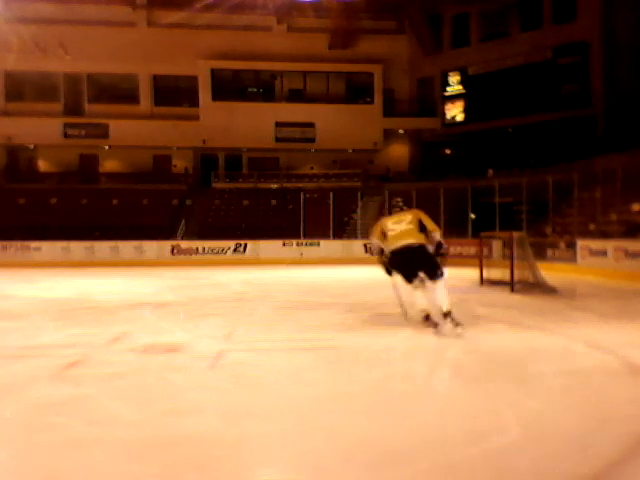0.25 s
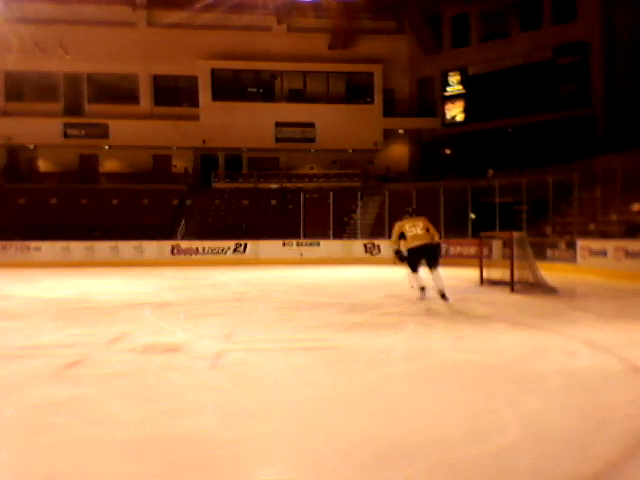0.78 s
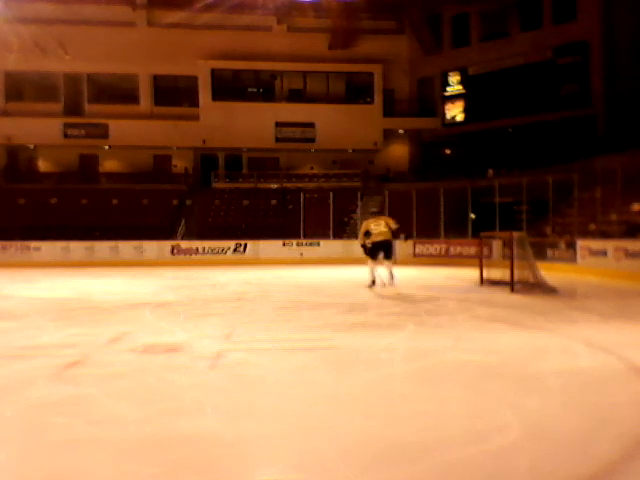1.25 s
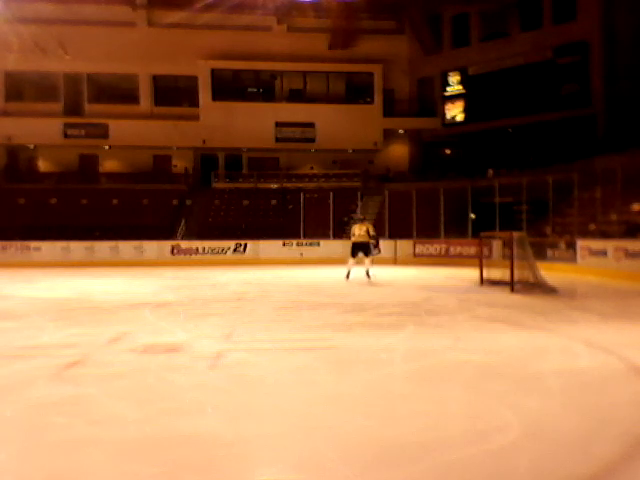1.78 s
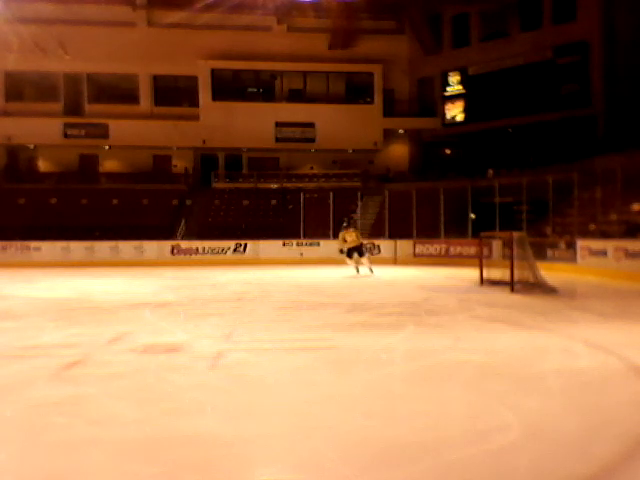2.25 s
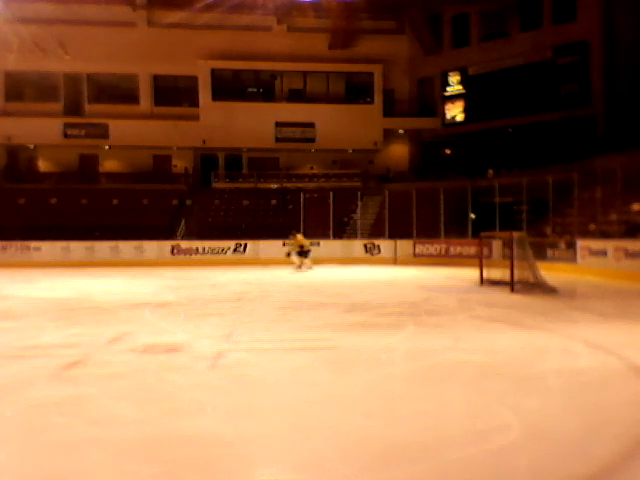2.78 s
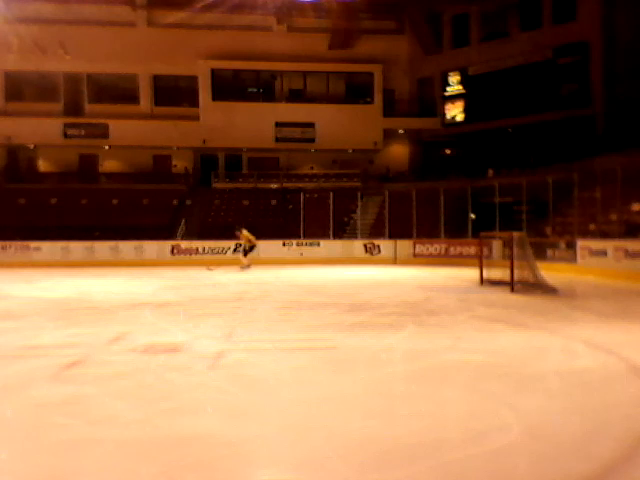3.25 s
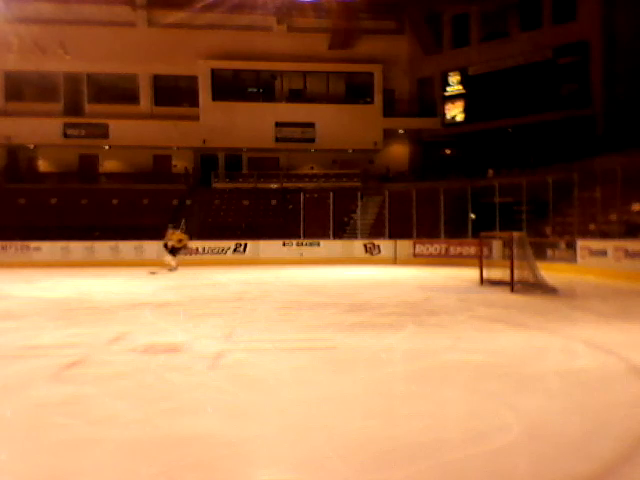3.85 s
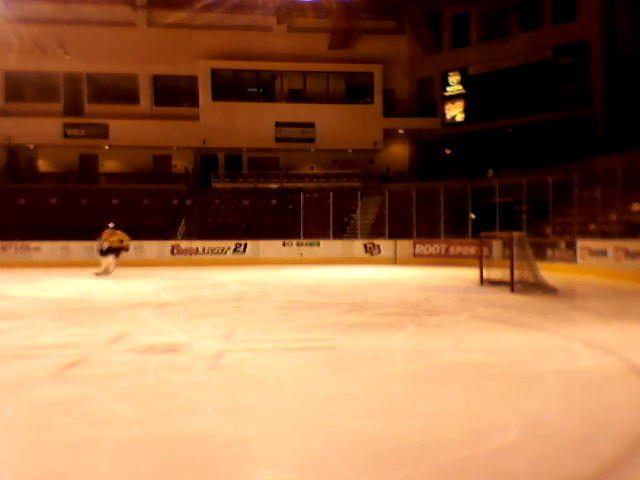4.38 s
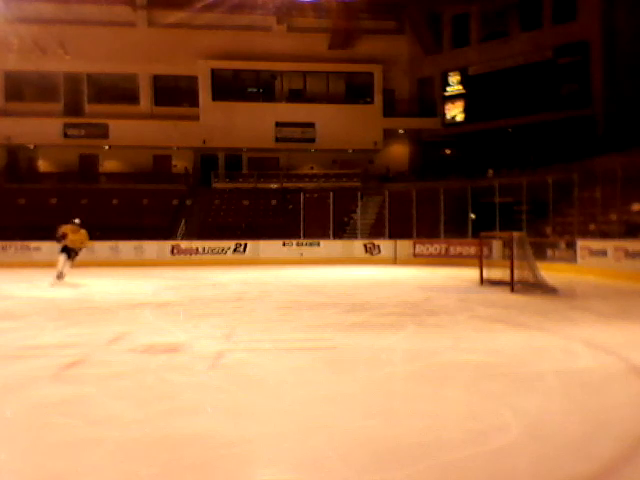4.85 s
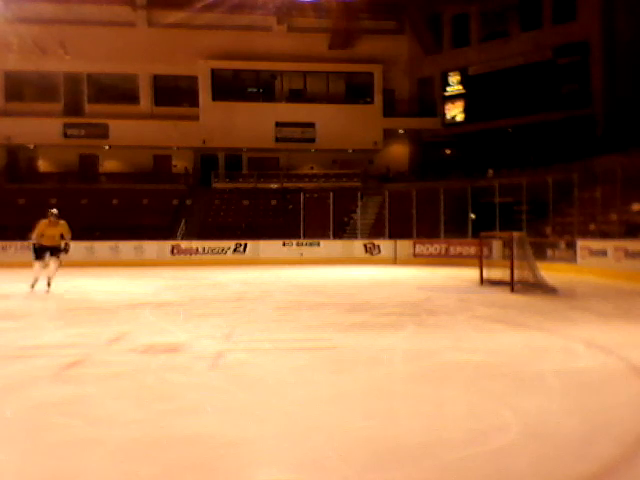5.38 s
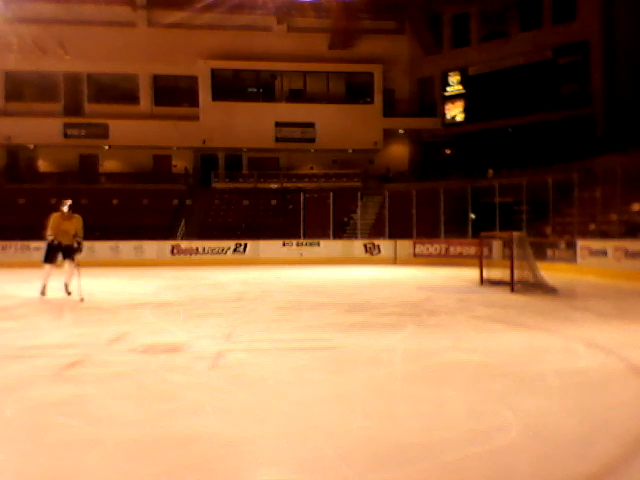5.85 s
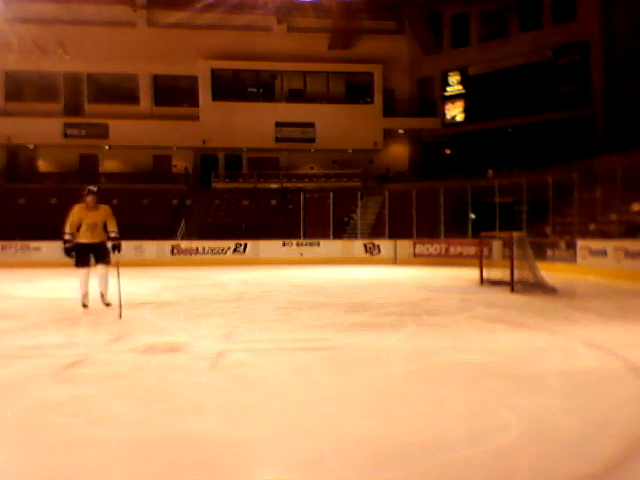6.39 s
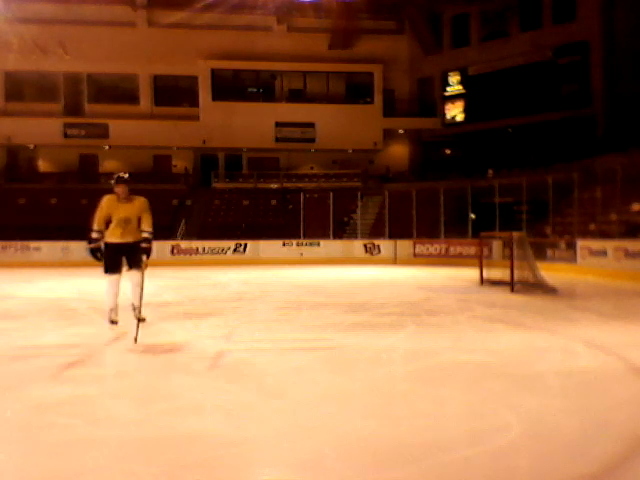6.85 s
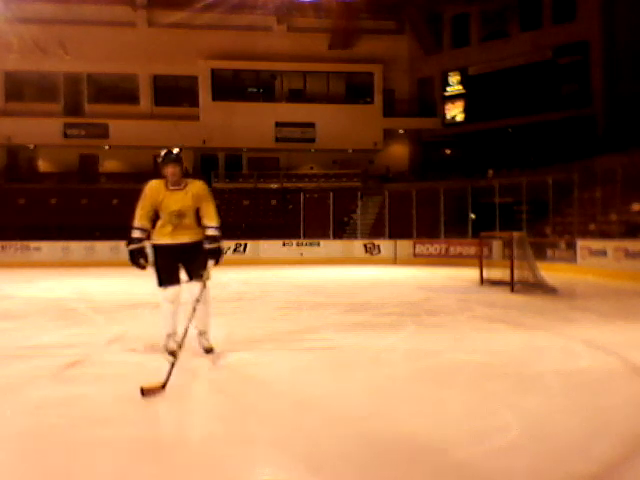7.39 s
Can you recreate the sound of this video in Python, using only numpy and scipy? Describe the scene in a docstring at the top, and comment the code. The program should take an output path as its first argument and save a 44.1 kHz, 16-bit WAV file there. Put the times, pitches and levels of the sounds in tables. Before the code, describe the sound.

Skate blades scrape over ice in short strides, mixed with sharp taps of steel and a hockey stick. A loud carving turn follows, crunching and throwing a hiss of spray, before the skater glides on more softly with occasional clacks. Everything reverberates in a big empty rink with a low rush of ventilation, and the small microphone overloads a little on the loudest hits.

```python
"""A hockey player's skates glide away over the ice, carve a hard turn and glide back.
The steel edges crush the ice in many tiny snaps that ring blade and boot and throw up spray.
Skates scuff and ping as they land; stick and blades clack on the ice. The large, empty indoor rink
echoes over the hum of its ventilation, and a small microphone overloads on the loudest hits."""
import sys
import numpy as np
from scipy import signal
from scipy.fft import rfft, irfft, next_fast_len
from scipy.io import wavfile
from scipy.ndimage import uniform_filter1d

SR = 44100
rng = np.random.default_rng(int(sys.argv[2]) if len(sys.argv) > 2 else 0)


def wav_record(signal):
    """Record a signal, one row per channel, as 16-bit PCM in the file named by sys.argv[1]."""
    frames = np.transpose(np.atleast_2d(signal))
    bounded = np.clip(frames, -1, 1)
    # unit amplitude maps onto the largest positive 16-bit level
    quanta = np.round(bounded * 32767).astype(np.int16)
    wavfile.write(sys.argv[1], SR, quanta)


N = 336702
TIME = np.arange(N) / SR

# Levels in the tables are relative: the functions turn whole layers up or down.
# The tone of rushing air, grinding ice, rumbling boot and ice spray.
# Each row: frequency in Hz, level in dB.
AIR_TONE = [(20, -32), (40, -13.5), (55, 2), (90, -3), (120, 8), (160, 0), (300, 8.5), (800, 3.5),
            (2000, -5), (7000, -11)]
GRIND_TONE = [(250, -37), (500, -16.5), (680, -4.5), (900, 0.5), (1130, 1), (1380, 0), (1700, -3.5),
              (2000, -1.5), (2350, -5.5), (2800, -8.5), (3500, -21), (5000, -30.5), (7000, -66.5)]
BOOT_TONE = [(50, -43.5), (130, -13), (185, -6.5), (235, -0.5), (320, 2.5), (420, 3), (540, 4.5), (750, -6),
             (1200, -41.5)]
SPRAY_TONE = [(1500, -46.5), (2400, -2), (3150, 1.5), (3700, -3), (4150, -1), (4900, -2.5), (5600, -5.5),
              (6100, -8), (6600, -16), (7200, -9)]
# How long the hall rings. Each row: frequency in Hz, ring time (seconds to fade by 60 dB).
HALL_RING_TIMES = [(100, 2.2), (500, 2.54), (1500, 1.95), (3500, 1.75), (7000, 0.27)]
# Echoes off the boards around the rink. Each row: delay in seconds, level in dB.
BOARD_ECHOES = [(0.03, -19.5), (0.06, -27.5), (.126, -16)]
# A blade is set down. Each row: start in seconds, level in dB, lowest pitch in Hz.
BLADE_PINGS = [(0.626, -7.5, 2500), (.732, -5.5, 2430), (.762, -1.5, 2300), (0.883, -11, 2550),
               (1.998, -34, 3060), (3.2945, -1, 3820), (3.385, -3.5, 3260), (3.450, -4.5, 3050),
               (3.465, -8.5, 2730), (4.254, -7, 3210), (4.366, -12, 2820), (6.181, -15, 2680),
               (6.311, -20, 2370)]
# The tones in a ping. Each row: multiple of the lowest pitch, level in dB, ring time in seconds.
PING_TONES = [(1, 6.5, 0.013), (1.13, 8.5, 0.0087), (1.281, 4, 0.012), (1.418, -10, 0.0046),
              (1.75, -7.5, 0.0088)]
# Stick or blade hits the ice. Each row: start in seconds, level in dB, main pitch in Hz, hardness in dB.
ICE_CLACKS = [(0.122, -7, 1005, -6), (.457, -6.5, 910, 0), (0.6299, -8.5, 883, 4), (0.7324, -8, 1160, -.5),
              (0.7624, -2.5, 1010, 5), (1.190, -7.5, 1104, 7), (1.287, -7, 866, -1), (1.4501, -7, 1273, -4),
              (3.591, -10.5, 1000, 1), (4.4926, -3.5, 1060, -4), (4.4952, -3, 1020, 5),
              (4.521, -4, 1080, -1.5), (4.55, -8.5, 990, 6), (4.617, -10, 980, 4.5), (5.4578, -11, 910, -7),
              (6.180, -11, 906, 10), (6.289, -10.5, 980, -12), (6.311, -12.5, 1150, 2),
              (6.336, -17, 1110, -9), (6.764, -3.5, 895, 2.5), (6.8997, -8, 1100, 3)]
# The tones in a clack, before they are moved to its pitch.
# Each row: frequency in Hz, level in dB, ring time in seconds.
CLACK_TONES = [(340, -33, .025), (700, -39.5, .012), (923, 17, .013), (1636, 12, 0.008),
               (2326, 7.5, 0.0091), (2680, -9, 0.0064), (4200, -27, .007)]
# Where the steel blade and its holder ring. Each row: frequency in Hz, width in Hz, level in dB.
BLADE_RESONANCES = [(502, 7, -17.5), (837, 36, -12), (1080, 160, -19), (1650, 210, -9), (2040, 69, -23.5),
                    (3204, 340, -15), (3660, 170, -6.5), (4720, 230, -16), (5240, 92, -11), (5970, 170, -9),
                    (6460, 160, 4.5)]
# An edge bites as a skate lands or pushes off.
# Each row: start in seconds, length in seconds, level in dB, spray in dB relative to that level.
EDGE_SCUFFS = [(0.136, 0.048, -13.5, -18), (0.477, 0.0067, -17.5, -10), (0.543, 0.0099, -14, -18),
               (.626, 0.005, -15, 4.5), (0.7294, 0.0087, -9, -7.5), (0.748, .0074, -13, -4),
               (0.76, .008, -16, -13.5), (0.882, 0.0089, -10, -5.5), (0.928, .024, -16.5, -8.5),
               (0.956, .016, -13.5, -11.5), (1.016, 0.018, -20, 4), (1.276, .022, -15.5, -30),
               (1.451, 0.0054, -9.5, -15), (1.997, .0066, -18, 0), (2.012, 0.034, -18.5, -4.5),
               (2.883, 0.03, -9.5, -13), (3.2945, 0.0024, -13, 4.5), (3.379, 0.01, -12, -1.5),
               (3.449, 0.0018, -16.5, -3.5), (3.464, 0.0078, -17.5, 1), (4.25, 0.011, -19, -3.5),
               (4.366, 0.0043, -11.5, -11), (4.376, 0.0074, -15, -1.5), (4.387, 0.014, -18.5, -7),
               (4.598, 0.019, -18.5, -14), (4.643, 0.0052, -18, -8.5), (5.379, 0.01, -21.5, -18),
               (5.45, 0.026, -24.5, -7.5), (6.180, 0.0034, -17, -1), (7.575, 0.013, -20, -4)]
# An edge shudders under the skater's weight.
# Each row: start in seconds, length in seconds, pitch in Hz, filter width in Hz, level in dB.
EDGE_JUDDERS = [(0, 0.48, 584, 326, -25.5), (.138, 0.041, 1880, 1200, -17.5),
                (0.45, 0.16, 1780, 800, -23.5), (0.866, 0.17, 358, 333, -21), (.7, 0.9, 271.4, 109, -32),
                (2.415, 0.24, 1732, 324, -20), (2.474, 0.65, 3300, 1000, -24.5),
                (2.806, 0.27, 833, 262, -21), (2.872, 0.032, 6550, 300, -21.5),
                (4.08, 0.18, 1620, 520, -26.5), (4.416, 0.72, 923, 383, -31),
                (7.417, 0.24, 1710, 604, -29.5), (7.397, 0.23, 3640, 796, -33)]
# The skater leans on one edge. Each row: start in seconds, length in seconds, grinding level in dB,
# then boot rumble and spray, both in dB relative to the grinding.
SKATE_STROKES = [(0.0, 0.2, -23, 1.5, -8.5), (0.466, 0.12, -25.5, -0.5, -10.5), (.6, 0.1, -29.5, 6, 0),
                 (0.736, .06, -29, 10, -12), (0.845, 0.19, -22.5, -1.5, -9.5),
                 (1.07, 0.19, -28.5, -10, -18), (2.061, 0.12, -23.5, -12, -4.5),
                 (2.365, 0.076, -22.5, -4, 0), (2.435, .14, -19.5, -16, 0.5), (2.51, 0.27, -28, -10, 10),
                 (2.769, 0.29, -17, -9.5, -4.5), (2.833, 0.058, -17, -11, -3),
                 (3.153, 0.13, -19, -12.5, -10), (3.4, .15, -19, -15, -10.5),
                 (4.065, 0.15, -27.5, -12.5, -6.5), (4.493, 0.29, -26, -22, -15),
                 (4.997, 0.13, -27.5, -12, -8.5), (6.03, 0.26, -41.5, 1.5, 9.5), (6.62, 0.35, -38, -1, 4.5)]
# The glide, loudest through the turn. Each row: time in seconds, grinding in dB, spray in dB.
GLIDE_LEVELS = [(0.0, -19, -32.5), (0.38, -23, -30), (0.93, -21, -28.5), (1.32, -20.5, -31.5),
                (2.04, -26.5, -32), (2.15, -23.5, -24.5), (2.72, -14, -18.5), (3.08, -15, -27.5),
                (3.4, -16.5, -24.5), (3.63, -20, -43.5), (3.87, -22, -40), (4.44, -28, -38.5),
                (4.59, -25.5, -36.5), (5.29, -29, -42), (5.88, -32.5, -34), (6.29, -29, -35),
                (7.46, -28, -32), (7.63, -26.5, -25)]


def undb(db):
    """Turn decibels into a factor to multiply by."""
    return 10 ** (np.asarray(db) / 20)


def unit(x):
    """Scale a signal to an average (rms) level of 1."""
    return x / np.sqrt(np.mean(x ** 2))


def on_log_axis(points, hz):
    """Read between (Hz, value) points, with octaves evenly spaced."""
    f, value = np.transpose(points)
    return np.interp(np.log(hz + 1), np.log(f), value)


def colour(x, tone):
    """Shape a sound with a tone table; it comes out at level 1."""
    size = next_fast_len(N)
    gain = undb(on_log_axis(tone, np.fft.rfftfreq(size, 1 / SR)))
    return unit(irfft(rfft(x, size) * gain, size)[:N])


def wander(per_s):
    """A smooth random wobble of size about 1 that turns about per_s times a second."""
    step = max(2, int(SR / per_s))
    stairs = np.repeat(rng.standard_normal(N // step + 2), step)
    return unit(uniform_filter1d(stairs, step)[:N])


def add(track, start, sound):
    """Mix a sound into the track at a start time in seconds."""
    i = int(np.clip(start * SR, 0, N - 1))
    track[i:i + len(sound)] += sound[:N - i]


def ventilation(hum_hz=71.7, hum_db=-61, rush_db=-38.5):
    """The rink's air system: a wavering fan hum and a soft rush of air."""
    phase = 2 * np.pi * np.cumsum(hum_hz + 1.4 * wander(5.6)) / SR
    hum = np.sqrt(2) * np.sin(phase) * undb(hum_db + 2.5 * wander(12))
    rush = colour(rng.standard_normal(N), AIR_TONE) * undb(rush_db + 0.5 * wander(0.79))
    return hum + rush


def hall(x, tail_db=-9, build_s=0.15):
    """Sound slaps back off the boards, then rings on in a long tail whose treble dies first."""
    t = TIME[:2 * SR]
    f = np.fft.rfftfreq(len(t), 1 / SR)
    noise, echo = rfft(rng.standard_normal(len(t))), np.zeros(len(t))
    for hz in 62.5 * 2 ** np.arange(8):
        octave = irfft(noise * ((f >= hz / np.sqrt(2)) & (f < hz * np.sqrt(2))))
        echo += octave * np.exp(-np.log(1000) * t / on_log_axis(HALL_RING_TIMES, hz))
    echo *= 1 - np.exp(-t / build_s)
    midrange = rfft(echo)[(f > 500) & (f < 2000)]
    echo *= undb(tail_db) / np.sqrt(np.mean(np.abs(midrange) ** 2))
    for delay, db in BOARD_ECHOES:
        add(echo, delay, undb([db]))
    return signal.fftconvolve(x, echo)[:N]


def strike(hz, db, ring_s, contact_s):
    """A short push sets several fading tones ringing; their sum peaks at 1."""
    t = TIME[:SR // 16, None]
    tones = undb(db) * np.sin(2 * np.pi * hz * t) * np.exp(-np.log(1000) * t / ring_s)
    ring = tones.sum(axis=1) * (1 - np.exp(-t[:, 0] / contact_s))
    return ring / np.abs(ring).max()


def pings():
    """The steel rings brightly as it lands, and the ice and the holder stop it at once."""
    out = np.zeros(N)
    multiple, tone_db, ring_s = np.transpose(PING_TONES)
    for start, db, lowest_hz in BLADE_PINGS:
        detune = 1 + 0.036 * rng.standard_normal(len(multiple))
        ring = strike(lowest_hz * multiple * detune, tone_db, ring_s, contact_s=0.00025)
        add(out, start, undb(db) * ring)
    return out


def clacks(crack_s=0.002, rattle_s=0.0078, thud_s=0.0025):
    """Stick and blades hit the ice: a brief ring, a crack of ice, a short rattle and a low thud."""
    out, t = np.zeros(N), TIME[:SR // 16]
    hz, tone_db, ring_s = np.transpose(CLACK_TONES)
    main_hz = hz[np.argmax(tone_db)]
    high_noise = colour(rng.standard_normal(N), SPRAY_TONE)
    mid_noise = colour(rng.standard_normal(N), GRIND_TONE)
    low_noise = colour(rng.standard_normal(N), BOOT_TONE)
    for start, db, pitch_hz, hard_db in ICE_CLACKS:
        detune = 1 + 0.062 * rng.standard_normal(len(hz))  # each blow lands on another spot
        blow_db = tone_db + hard_db * (hz > main_hz)  # a hard blow favours the high tones
        ring = strike(hz * pitch_hz / main_hz * detune, blow_db, ring_s, contact_s=0.00042)
        now = slice(int(start * SR), int(start * SR) + len(t))
        crack = undb(hard_db - 22) * high_noise[now] * np.exp(-t / crack_s)
        rattle = undb(-21) * mid_noise[now] * np.exp(-t / rattle_s)
        thud = undb(-23) * low_noise[now] * (t / thud_s) * np.exp(1 - t / thud_s)
        add(out, start, undb(db) * (ring + crack + rattle + thud))
    return out


def fractures(per_s, spread_db, hiss_db):
    """Ice breaks under an edge: snaps of random size over the smooth hiss of sliding."""
    size = undb(spread_db * np.minimum(rng.exponential(size=N), 4))
    snaps = (rng.random(N) < per_s / SR) * size * rng.choice([-1, 1], N)
    return unit(snaps) + undb(hiss_db) * rng.standard_normal(N)


def blade_ring(x, wander_db=8):
    """The spot touching the ice moves along the curved blade, so each ringing tone comes and goes."""
    out = x.copy()
    for hz, width_hz, db in BLADE_RESONANCES:
        ringing = signal.lfilter(*signal.iirpeak(hz, hz / width_hz, fs=SR), x)
        out += ringing * undb(db + wander_db * np.clip(wander(9.7), -2, 1.4))
    return out


def scuffs(rise_s=0.00022, release_s=0.0018):
    """An edge bites for a moment and lets go: a burst of crushed ice."""
    force, spray_force = np.zeros((2, N))
    t = TIME[:SR // 10]
    for start, length, db, spray_db in EDGE_SCUFFS:
        release = np.exp(-np.maximum(t - length, 0) / release_s)
        bite = undb(db - 2.5) * (1 - np.exp(-t / rise_s)) * release
        add(force, start, bite)
        add(spray_force, start, bite * undb(spray_db))
    snaps = fractures(per_s=5000, spread_db=-0.5, hiss_db=-4.5)
    crunch = colour(snaps, GRIND_TONE) + undb(-16) * colour(snaps, BOOT_TONE)
    return force * crunch + spray_force * colour(snaps, SPRAY_TONE)


def judders():
    """A loaded edge sticks and slips, so one pitch of boot or blade swells and fades."""
    out, slips = np.zeros(N), fractures(per_s=1600, spread_db=3, hiss_db=-11)
    for start, length, hz, width_hz, db in EDGE_JUDDERS:
        b, a = signal.iirpeak(hz, hz / width_hz, fs=SR)
        ringing = unit(signal.lfilter(b, a, signal.lfilter(b, a, slips)))  # twice, for a clearer pitch
        swell = np.sin(np.pi * np.clip((TIME - start) / length, 0, 1))
        out += undb(db) * np.sqrt(np.abs(swell)) * ringing
    return out


def stroke_forces(rise_s=0.02, release_s=0.037):
    """How hard the strokes drive grinding, boot and spray: weight comes on, holds and lets go."""
    power = np.zeros((3, N))
    for start, length, db, boot_db, spray_db in SKATE_STROKES:
        rise = np.clip((TIME - start) / rise_s, 0, 1)
        release = np.exp(-np.maximum(TIME - start - length, 0) / release_s)
        power += np.outer(undb([db, db + boot_db, db + spray_db]), rise * release) ** 2
    return np.sqrt(power)


def glide_forces(boot_share=0.32, boot_fade_db_per_s=1.5):
    """How hard the glide drives grinding, boot and spray; the boot fades as the skater slows."""
    times, *levels = np.transpose(GLIDE_LEVELS)
    grind_db, spray_db = (np.interp(TIME, times, db) for db in levels)
    boot_db = -20 + boot_share * grind_db - boot_fade_db_per_s * TIME
    return undb([grind_db - 2.5, boot_db, spray_db - 0.5])


def skating():
    """Gliding and carving: the edge chatters over the ice, shakes the boot and shaves off spray."""
    grind_force, boot_force, spray_force = np.hypot(glide_forces(), stroke_forces())
    chatter_db = 1.15 * wander(70) + 0.7 * wander(20)
    snaps = fractures(per_s=2600, spread_db=0.5, hiss_db=3)
    # now and then the edge meets a rut and a larger chip breaks off
    chips = undb(-9) * fractures(per_s=70, spread_db=2.5, hiss_db=-23.5)
    grind = colour(snaps + chips, GRIND_TONE) * undb(chatter_db)
    boot = colour(snaps, BOOT_TONE) * undb(1.1 * wander(18))
    shavings = fractures(per_s=4200, spread_db=1.5, hiss_db=4.5)
    spray = colour(shavings, SPRAY_TONE) * undb(0.37 * chatter_db)
    return grind_force * grind + boot_force * boot + spray_force * spray


def scene():
    """Mix skater, hall and ventilation into one channel."""
    sliding = undb(-2) * blade_ring(skating()) + judders()
    hits = undb(-2.5) * blade_ring(scuffs()) + clacks() + pings()
    echoes = hall(sliding + undb(4) * hits)
    return (sliding + hits + echoes + ventilation())[None]


def record(dry, low_cut_hz=47, high_cut_hz=6850, ceiling=0.73, top_hz=15800):
    """A small microphone loses deep bass and high treble; its amplifier flattens the tallest peaks."""
    dull = signal.sosfilt(signal.ellip(12, .2, 70, high_cut_hz, fs=SR, output="sos"), dry)
    flattened = dull / (1 + (dull / ceiling) ** 16) ** (1 / 16)
    thin = signal.sosfilt(signal.butter(3, low_cut_hz, "high", fs=SR, output="sos"), flattened)
    return signal.sosfilt(signal.ellip(8, .2, 70, top_hz, fs=SR, output="sos"), thin)


dry = scene()
out = record(dry)
wav_record(out)
```